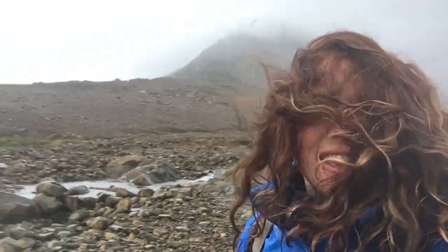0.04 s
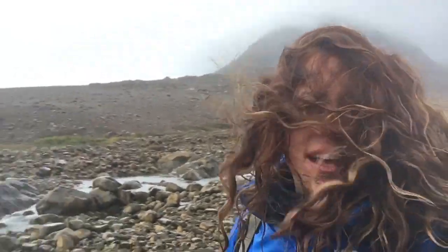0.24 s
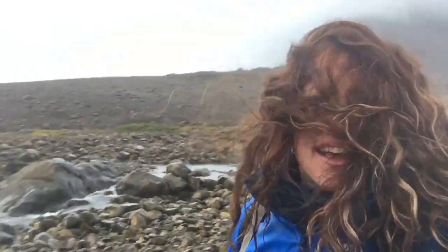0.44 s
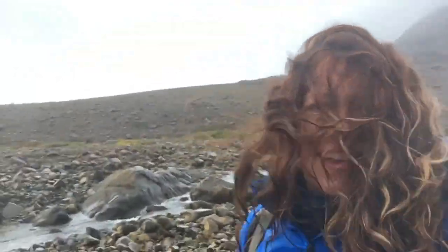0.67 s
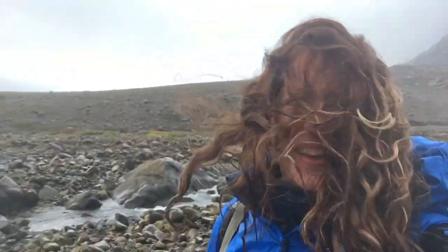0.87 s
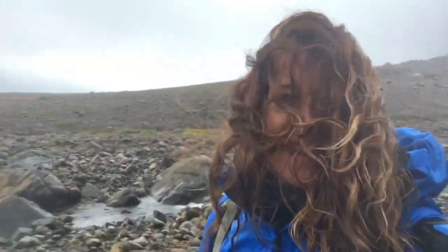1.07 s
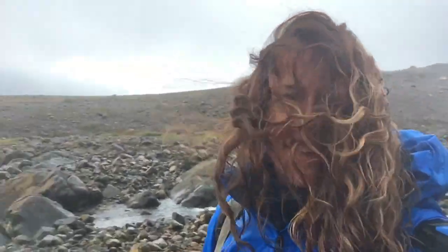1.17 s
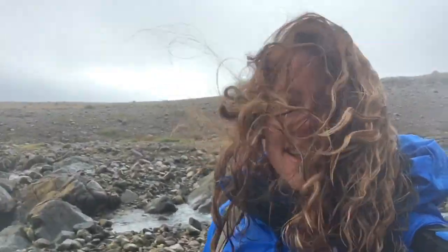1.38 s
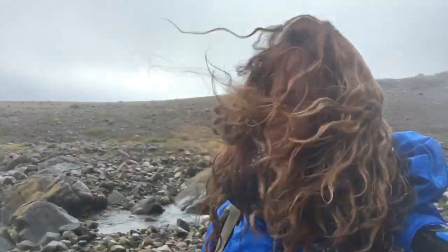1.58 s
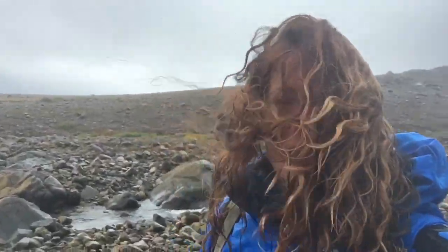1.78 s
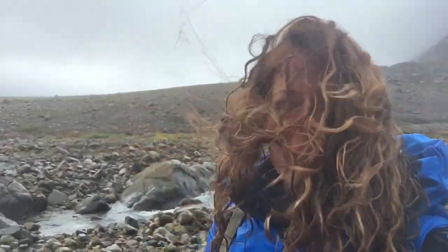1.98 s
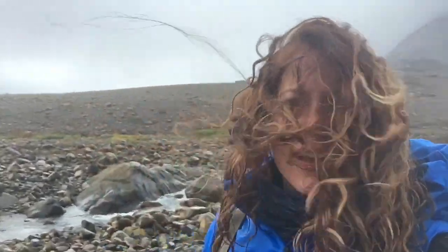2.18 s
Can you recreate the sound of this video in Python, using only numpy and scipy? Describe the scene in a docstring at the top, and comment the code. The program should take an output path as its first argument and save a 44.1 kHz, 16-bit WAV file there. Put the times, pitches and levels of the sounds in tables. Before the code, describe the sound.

Wind noise overloads a small microphone outdoors, beginning with low thumps and flutters, swelling into harsh ripping gusts with sharp little snaps, then dipping to softer bass bumps before another push at the end.

```python
"""Bare moor: strong wind tears across the port of a small hand-held microphone.
Large slow eddies rumble as lumpy low noise; a churning rush of fluttering noise bands rides on it.
Hard buffets burst through as short noise bursts, with sharp snaps of the smallest eddies in the treble.
Far water and wind hiss faintly as smooth noise. A limiter holds the peaks."""
import sys
import numpy as np
from scipy import signal
from scipy.io import wavfile
from scipy.ndimage import uniform_filter1d, minimum_filter1d

SR = 44100
rng = np.random.default_rng(int(sys.argv[2]) if len(sys.argv) > 2 else 0)


def waveform_to_disk(signal):
    """Save audio, clipped to [-1, 1], as 16-bit WAV at the path in sys.argv[1]."""
    frames = np.transpose(np.atleast_2d(signal))
    scaled = np.clip(frames, -1, 1) * 32767
    samples = np.round(scaled).astype(np.int16)
    wavfile.write(sys.argv[1], SR, samples)


def volts_from_db(level):
    """Convert decibel levels to linear amplitude ratios."""
    exponent = np.asarray(level, float) / 20
    return 10 ** exponent


N = 98166   # samples

# Large eddies, before lumps: (time [s], level [dB])
RUMBLE_CURVE = [(0.0, -10), (0.1, -41.5), (0.15, -18.5), (0.3, -27), (0.33, -11), (0.36, -32), (0.39, -6.5),
                (0.48, -21), (0.52, -7.5), (0.6, -19), (0.625, -20.5), (0.655, -34.5), (0.75, -35.5),
                (0.82, -16), (0.97, -18), (0.99, -15.5), (1.12, -31.5), (1.16, -11), (1.2, -25.5),
                (1.24, -15.5), (1.29, -35.5), (1.42, -18.5), (1.44, -33), (1.55, -5.5), (1.61, -25.5),
                (1.74, -23.5), (1.85, -25), (1.93, -18.5), (1.97, -22), (2.07, -9), (2.09, -28.5),
                (2.13, -8.5), (2.18, -29.5), (2.22, -8)]
# Relative rumble spectrum: (frequency [Hz], level per Hz [dB])
RUMBLE_SPECTRUM = [(15, -38.5), (25, -35), (40, -1), (63, 11.5), (100, 3), (150, -1.5), (220, -6),
                   (400, -70.5)]
RUMBLE_LUMP_DB, RUMBLE_LUMP_RATE_HZ = 2, 9.3

# Churning between buffets, before surge: (time [s], level at 250 Hz [dB], level near 1230 Hz [dB])
RUSH_CURVE = [(0.0, -58, -40), (0.07, -25.5, -100), (0.1, -50, -61.5), (0.17, -40, -53), (0.28, -40, -54.5),
              (0.33, -35, -55), (0.36, -39, -61), (0.39, -18, -47), (0.54, -16, -50.5), (0.59, -30, -60),
              (0.62, -23, -36.5), (0.7, -43.5, -56.5), (0.82, -16.5, -26.5), (0.95, -21.5, -42.5),
              (0.98, -13, -37), (1.09, -28.5, -43.5), (1.11, -19.5, -37), (1.21, -21, -46), (1.4, -18, -46),
              (1.43, -34.5, -57.5), (1.46, -23, -45.5), (1.56, -17.5, -51.5), (1.61, -31, -47),
              (1.75, -22.5, -62), (1.83, -42.5, -70), (1.96, -35.5, -62), (2.13, -22, -49.5),
              (2.18, -26, -56.5), (2.2, -22, -50), (2.22, -18, -58)]
# Buffets, before trim: (crest time [s], level at 900 Hz [dB], at 250 Hz [dB], at 3500 Hz [dB],
# length at 900 Hz, floored at 1 ms [s])
BUFFET_ROWS = [(0.014, -20, -19, -69, 0.0015), (0.058, -32, -16.5, -91, 0.0026),
               (0.161, -52, -20, -80, 0.0069), (0.194, -46, -25, -68, 0.0064),
               (0.233, -42, -17, -58, 0.0087), (0.274, -41, -19.5, -70, 0.0039),
               (0.315, -29, -6.5, -64, 0.0019), (0.3271, -34.5, -7.5, -62, 0.0018),
               (0.3928, -15, -15.5, -38, 0.003), (0.4377, -18.5, -20, -56.5, 0.0036),
               (0.457, -28, -17, -72, 0.0044), (0.501, -22, -13.5, -38, 0.0037),
               (0.523, -10.5, -46, -30, 0.0021), (0.533, -14, -15, -25, 0.0043),
               (0.5483, -15.5, -18, -47, 0.0024), (0.559, -26.5, -12, -39.5, 0.004),
               (0.593, -20, -25.5, -60, 0.0011), (0.61, -14, -22, -35, 0.0024),
               (0.617, -13, -6, -19, 0.0028), (0.627, -32, -0.5, -42, 0.0019),
               (0.655, -21, -49, -33, 0.0013), (0.667, -22.5, -19.5, -27.5, 0.0024),
               (0.678, -31, -40, -41, 0.0011), (0.725, -41, -42, -51.5, 0.0014),
               (0.7515, -20, -53.5, -49.5, 0.0039), (0.7633, -20, -31, -41, 0.004),
               (0.7826, -17.5, -19, -39, 0.006), (0.792, -22.5, -32, -31, 0.0034),
               (0.7983, -4.5, -1, -24.5, 0.0013), (0.809, -16, -32, -38, 0.0018),
               (0.823, -20, -25, -11, 0.0026), (0.8355, -27, -5.5, -31, 0.0033),
               (0.845, -14, -16, -33, 0.0011), (0.8523, 1, -25, -28, 0.0014),
               (0.863, -18.5, -31, -48, 0.004), (0.8725, -14.5, -14, -28, 0.0053),
               (0.8872, -10, -4.5, -37, 0.0013), (0.9021, -12, -7.5, -13, 0.0009),
               (0.931, -11.5, -26, -24.5, 0.00094), (0.945, -25.5, -32, -36, 0.0061),
               (0.975, -20, -30, -36, 0.0038), (0.986, -22.5, -34, -58, 0.0049),
               (1.014, -19.5, -34, -45, 0.0038), (1.025, -21, -12.5, -36, 0.0042),
               (1.0333, -14, -15, -40, 0.0013), (1.047, -20.5, -14, -65, 0.0051),
               (1.08, -23, -15, -67, 0.0048), (1.11, -17.5, -17, -39, 0.0097),
               (1.1288, -12, -23, -31, 0.0015), (1.137, -5.5, -8.5, -29, 0.00071),
               (1.148, -24, -33, -59, 0.0048), (1.168, -11.5, -4.5, -45, 0.0025),
               (1.1896, -18.5, -38, -53, 0.0025), (1.2, -27, -20, -58, 0.0013),
               (1.2163, -19.5, -40, -66, 0.0018), (1.228, -19, -57, -38, 0.0008),
               (1.2426, -15, -16.5, -48, 0.003), (1.264, -20, -24, -24, 0.0037),
               (1.2794, -21, -24, -53, 0.0041), (1.298, -17.5, -26, -39.5, 0.005),
               (1.3105, -21, -14.5, -32, 0.0045), (1.3261, -18, -22, -37.5, 0.0051),
               (1.343, -10, -26, -54, 0.00068), (1.363, -16, -28, -30, 0.0023),
               (1.372, -17.5, -11, -25.5, 0.0031), (1.3847, -17.5, -38, -50.5, 0.0048),
               (1.4, -26, -11.5, -37.5, 0.0041), (1.4063, -28, -23.5, -66, 0.006),
               (1.453, -52, -42, -64, 0.0024), (1.462, -21.5, -11.5, -47, 0.0035),
               (1.4805, -16, -13, -72, 0.001), (1.508, -25, -12, -85, 0.0037),
               (1.5245, -12, -33.5, -31, 0.0011), (1.538, -23.5, -17.5, -37, 0.0039),
               (1.555, -23.5, -20.5, -47, 0.0087), (1.5783, -16.5, -20, -51, 0.0022),
               (1.5858, -26, -15.5, -24, 0.00097), (1.601, -22.5, -38, -72, 0.0046),
               (1.6185, -19.5, -16.5, -35.5, 0.0015), (1.6264, -21.5, -25, -41, 0.0017),
               (1.6548, -19, -17, -35.5, 0.0023), (1.663, -31, -23.5, -45.5, 0.0048),
               (1.728, -34, -27, -59, 0.002), (1.742, -36.5, -12, -64, 0.0041),
               (1.752, -29.5, -45, -59, 0.0028), (1.7717, -30.5, -24.5, -62, 0.003),
               (1.812, -44.5, -20.5, -77, 0.0021), (1.855, -54, -30.5, -74.5, 0.0025),
               (1.883, -30.5, -30.5, -76, 0.0048), (1.923, -31, -37.5, -85, 0.0048),
               (1.9394, -38.5, -20.5, -72.5, 0.0037), (1.99, -33, -26, -61, 0.0023),
               (2.041, -31.5, -20, -78, 0.0081), (2.062, -25, -31.5, -70.5, 0.0023),
               (2.1168, -20, -24.5, -36, 0.0044), (2.1383, -18, -19, -53, 0.0024),
               (2.1648, -18.5, -27, -62, 0.0016), (2.177, -36, -25, -77, 0.0009),
               (2.202, -20.5, -10, -47, 0.0044), (2.212, -13.5, -28, -46, 0.0019)]
# Buffet level trim: (low [dB], middle [dB], high [dB])
BUFFET_TRIM_BY_PITCH_DB = [-1.5, 1, -8]
# Pitches of the buffet levels: (low [Hz], middle [Hz], high [Hz])
BUFFET_PITCH_HZ = [250, 900, 3500]
BUFFET_RISE_SHARE = 0.77   # rise time / fall time
BUFFET_LENGTH_EXPONENT = 0.5   # length grows toward the bass
# Rush and buffet fine shape, relative to the three buffet pitches: (frequency [Hz], level per Hz [dB])
EDDY_SPECTRUM = [(45, -13.5), (90, -2), (150, 0.5), (250, -0.5), (400, -4.5), (650, -6.5), (900, -16),
                 (1500, -15.5), (3500, -31), (4600, -54.5), (5500, -74.5), (9000, -80), (16000, -113)]
FLUTTER_AT_900_HZ_DB, FLUTTER_DB_PER_OCTAVE, FLUTTER_RATE_HZ = 4, 2.9, 340
SURGE_DB, SURGE_RATE_HZ = 3, 20.3
BUFFET_FLUTTER_SHARE = 0.52   # buffet flutter / rush flutter
BAND_EDGES_HZ = 20 * 2 ** np.arange(0, 9.8, 1 / 3)
EDDY_STEADINESS = 0.42   # 0: free height, 1: even height

# Snaps of the smallest eddies, before lift: (start time [s], body peak level [dB], tip peak level [dB])
SNAP_ROWS = [(0.3965, -29, -66.5), (0.5225, -37, -53), (0.5295, -25.5, -56), (0.609, -35, -59),
             (0.6171, -21, -58.5), (0.6274, -44, -73), (0.6539, -44, -71), (0.664, -34, -70.5),
             (0.7502, -41, -67), (0.7809, -39, -63), (0.7863, -23, -60), (0.7986, -21, -68),
             (0.808, -28, -59), (0.819, -22, -58), (0.8354, -31, -67), (0.8438, -21.5, -70),
             (0.8517, -30, -70), (0.873, -38, -60), (0.876, -34, -62.5), (0.8854, -19, -58),
             (0.9016, -31, -52), (0.9293, -40, -71), (0.9612, -36, -75), (1.0203, -33, -71),
             (1.1135, -38, -74), (1.1266, -35, -68), (1.135, -31, -65), (1.1651, -33, -68),
             (1.2034, -46, -69), (1.225, -44, -69), (1.2408, -31, -69), (1.2599, -28.5, -70),
             (1.3058, -33.5, -74.5), (1.3228, -33, -72), (1.363, -40, -71), (1.3726, -30.5, -75),
             (1.3958, -37, -72), (1.4617, -33.5, -73), (1.5209, -37.5, -70), (1.5383, -34, -74.5),
             (1.5872, -28, -72), (1.6156, -44, -80), (1.6551, -49.5, -79), (2.1156, -45, -66)]
SNAP_BODY_LOW_HZ, SNAP_BODY_HIGH_HZ, SNAP_TIP_LOW_HZ = 1500, 3410, 6000
SNAP_WIDTH_S, SNAP_BODY_LIFT_DB, SNAP_TIP_LIFT_DB = 0.00027, 4, 6.5

# Far hiss: (time [s], level [dB], part above 7 kHz relative to its spectrum [dB])
HISS_CURVE = [(0, -49.5, 1), (.52, -52, 0.5), (.55, -55.5, -0.5), (1.1, -52.5, -8), (1.7, -59, -3),
              (2.0, -59.5, -1.5)]
# Relative hiss spectrum: (frequency [Hz], level per Hz [dB])
HISS_SPECTRUM = [(500, 3), (1000, 8), (2000, 2.5), (3000, -4.5), (4400, -12.5), (4900, -10.5), (5600, -11),
                 (7500, -19), (9500, -17), (10500, -25), (12000, -18), (14500, -21.5), (16000, -27)]

BASS_CUT_HZ = 34.8
LIMITER_CEILING, LIMITER_WINDOW_S, LIMITER_RECOVERY_DB_PER_S = 0.7, 0.003, 293.5


def rms_one(x):
    """Scale to rms 1."""
    return x / np.sqrt(np.mean(x ** 2) + 1e-20)


def in_time(rows):
    """Curve columns, one value per sample."""
    time_s, *columns = np.transpose(rows)
    return [np.interp(np.arange(N) / SR, time_s, column) for column in columns]


def at_hz(points, hz):
    """Spectrum level on a log frequency axis."""
    points_hz, level_db = np.transpose(points)
    return np.interp(np.log(hz), np.log(points_hz), level_db)


def filtered(x, order, hz, kind):
    """Butterworth filter."""
    return signal.sosfilt(signal.butter(order, hz, kind, fs=SR, output="sos"), x)


def rounded(x, hz):
    """Steep low-pass: an eddy cannot change faster than its size allows."""
    return filtered(x, 4, min(hz, 0.45 * SR), "low")


def drift(rate_hz):
    """Random fluctuation of rms 1: noise through a double-pole low-pass."""
    r = np.exp(-2 * np.pi * rate_hz / SR)
    noise = rng.standard_normal(N + SR)
    return rms_one(signal.lfilter([1], [1, -2 * r, r * r], noise)[SR:])


def bands(steadiness=0.0):
    """Centres [Hz] and third-octave noise bands of unit height per Hz; steadiness evens their height."""
    settle = 9000   # samples dropped
    white = rng.standard_normal((2, N + settle))
    out = []
    for k, (low_hz, high_hz) in enumerate(zip(BAND_EDGES_HZ, BAND_EDGES_HZ[1:])):
        # neighbours come from independent noises
        band = filtered(white[k % 2], 2, [low_hz, high_hz], "band")[settle:]
        height = np.sqrt(uniform_filter1d(band ** 2, int(SR / low_hz)) + 1e-9)
        evened = rms_one(band / height ** steadiness)
        out.append((np.sqrt(low_hz * high_hz), np.sqrt(high_hz - low_hz) * evened))
    return out


def coloured(spectrum, steadiness=0.0):
    """Noise of a given spectrum, rms 1."""
    return rms_one(sum(volts_from_db(at_hz(spectrum, hz)) * band for hz, band in bands(steadiness)))


def rumble():
    """Large eddies: low noise whose level wanders in lumps."""
    level_db = in_time(RUMBLE_CURVE)[0] + RUMBLE_LUMP_DB * drift(RUMBLE_LUMP_RATE_HZ)
    return rounded(volts_from_db(level_db) * coloured(RUMBLE_SPECTRUM, EDDY_STEADINESS), 450)


def buffet_power(hz, place):
    """Summed power of all buffets at one pitch: Gaussian rise and fall, longer in the bass."""
    power = np.zeros(N)
    for crest_s, mid_db, low_db, high_db, length_s in BUFFET_ROWS:
        levels_db = np.add([low_db, mid_db, high_db], BUFFET_TRIM_BY_PITCH_DB)
        level_db = np.interp(place, [0, 1, 2], levels_db)
        fall_s = max(length_s, 0.001) * (BUFFET_PITCH_HZ[1] / hz) ** BUFFET_LENGTH_EXPONENT
        start = max(int((crest_s - 3 * fall_s) * SR), 0)
        stop = min(int((crest_s + 5 * fall_s) * SR), N)
        t = np.arange(start, stop) / SR - crest_s
        width_s = np.where(t < 0, BUFFET_RISE_SHARE * fall_s, fall_s)
        power[start:stop] += volts_from_db(2 * level_db) * np.exp(-(t / width_s) ** 2)
    return power


def eddies():
    """Rush and buffets: small eddies arrive in fluttering clumps, sharper toward the treble."""
    low_db, high_db = in_time(RUSH_CURVE)
    flutter, surge = drift(FLUTTER_RATE_HZ), drift(SURGE_RATE_HZ)
    log_pitch = np.log(BUFFET_PITCH_HZ)
    out = np.zeros(N)
    for hz, band in bands(EDDY_STEADINESS):
        # place: 0 low, 1 middle, 2 high buffet pitch
        place = np.interp(np.log(hz), log_pitch, [0, 1, 2])
        anchor_db = np.interp(place, [0, 1, 2], at_hz(EDDY_SPECTRUM, BUFFET_PITCH_HZ))
        spread_hz = np.interp(np.log(hz), log_pitch, [400, 1500, 2500])
        per_hz = volts_from_db(at_hz(EDDY_SPECTRUM, hz) - anchor_db) / np.sqrt(spread_hz)

        octaves = np.log2(hz / BUFFET_PITCH_HZ[1])
        depth_db = max(FLUTTER_AT_900_HZ_DB + FLUTTER_DB_PER_OCTAVE * octaves, 0)
        rush_flutter = rms_one(volts_from_db(depth_db * flutter))
        buffet_flutter = rms_one(volts_from_db(BUFFET_FLUTTER_SHARE * depth_db * flutter))

        rush = volts_from_db(low_db + (high_db - low_db) * place / 1.23 + SURGE_DB * surge)
        power = (rush_flutter * rush) ** 2 + buffet_flutter ** 2 * buffet_power(hz, place)
        out += rounded(per_hz * np.sqrt(power) * band, 2 * hz)
    return out


def snaps():
    """Smallest eddies: Gaussian noise jolts under a millisecond, each a body plus a thin treble tip."""
    t = np.arange(-44, 220) / SR
    jolts = rng.standard_normal((len(SNAP_ROWS), len(t))) * np.exp(-(t / SNAP_WIDTH_S) ** 2)
    bodies = filtered(jolts, 2, [SNAP_BODY_LOW_HZ, SNAP_BODY_HIGH_HZ], "band")
    bodies = rounded(bodies, 2 * SNAP_BODY_HIGH_HZ)
    tips = filtered(jolts, 2, [SNAP_TIP_LOW_HZ, 2 * SNAP_TIP_LOW_HZ], "band")
    out = np.zeros(N + len(t))
    for (start_s, body_db, tip_db), body, tip in zip(SNAP_ROWS, bodies, tips):
        i = int(start_s * SR)
        out[i:i + len(t)] += volts_from_db(body_db + SNAP_BODY_LIFT_DB) * body / np.abs(body).max()
        out[i:i + len(t)] += volts_from_db(tip_db + SNAP_TIP_LIFT_DB) * tip / np.abs(tip).max()
    return out[:N]


def far_hiss():
    """Distant water and wind: smooth noise; the part above 7 kHz has its own level curve."""
    level_db, top_db = in_time(HISS_CURVE)
    hiss = volts_from_db(level_db) * coloured(HISS_SPECTRUM)
    return rounded(hiss, 7000) + volts_from_db(top_db) * filtered(hiss, 4, 7000, "high")


def scene():
    """All layers at one microphone."""
    return (rumble() + eddies() + snaps() + far_hiss())[None]


def low_pass(x):
    """Removes everything above the highest recorded frequency."""
    return signal.sosfilt(signal.butter(12, 15800, fs=SR, output="sos"), x)


def record(dry):
    """Bass cut, then a look-ahead limiter with linear dB recovery."""
    dry = filtered(dry, 3, BASS_CUT_HZ, "high")
    size = int(LIMITER_WINDOW_S * SR)
    ramp_db = LIMITER_RECOVERY_DB_PER_S * np.arange(N) / SR
    over_db = np.maximum(20 * np.log10(np.abs(dry[0]) / LIMITER_CEILING + 1e-9), 0)
    recovering_db = np.maximum.accumulate(over_db + ramp_db) - ramp_db
    cut_db = -minimum_filter1d(-recovering_db, size=size)   # centred window: sees peaks ahead
    for _ in range(2):
        cut_db = uniform_filter1d(cut_db, size=size // 2)
    held = dry * volts_from_db(-cut_db)
    return low_pass(held)


dry = scene()
out = record(dry)
waveform_to_disk(out)
```